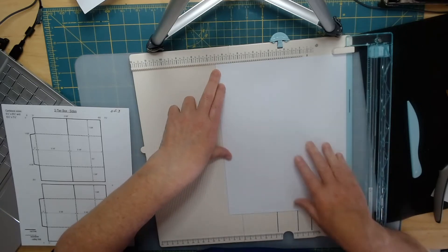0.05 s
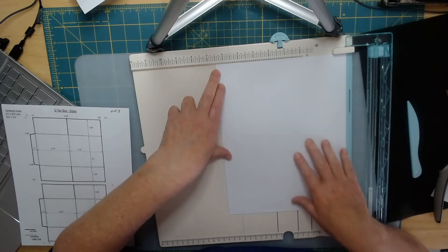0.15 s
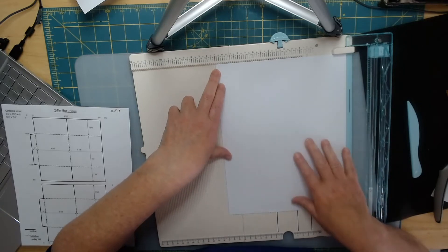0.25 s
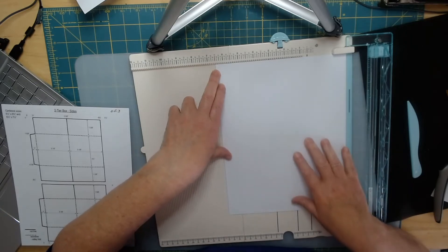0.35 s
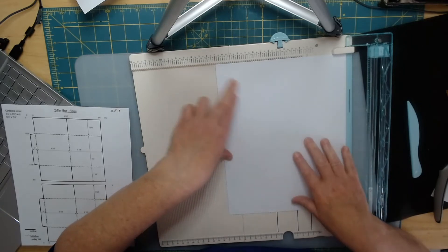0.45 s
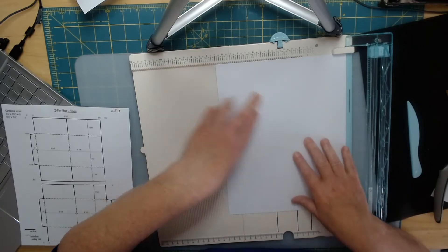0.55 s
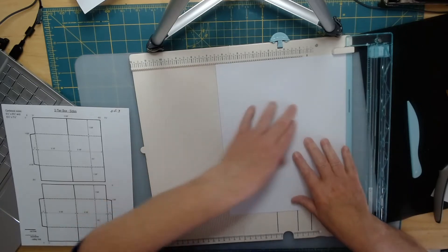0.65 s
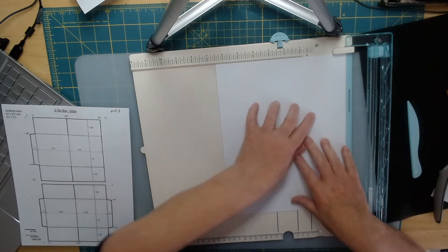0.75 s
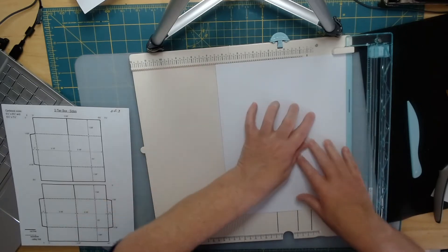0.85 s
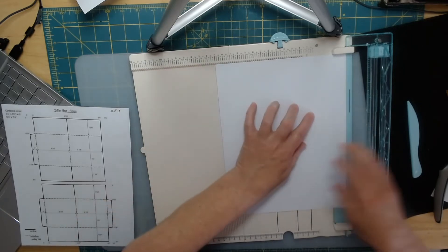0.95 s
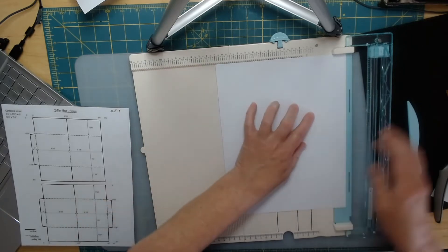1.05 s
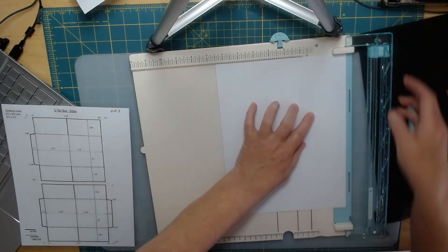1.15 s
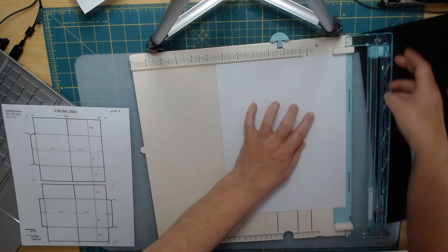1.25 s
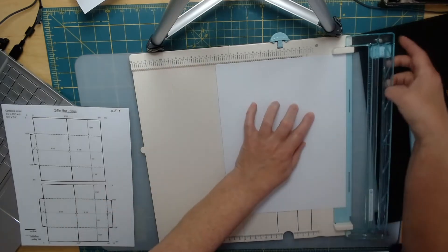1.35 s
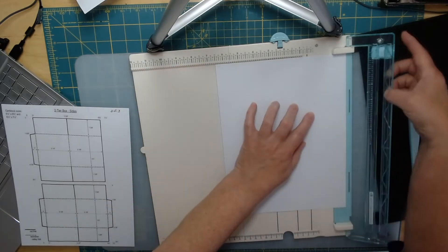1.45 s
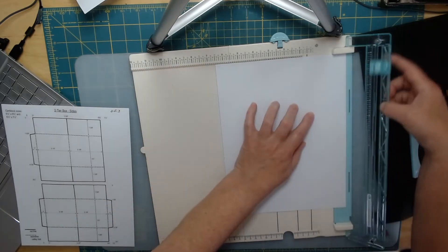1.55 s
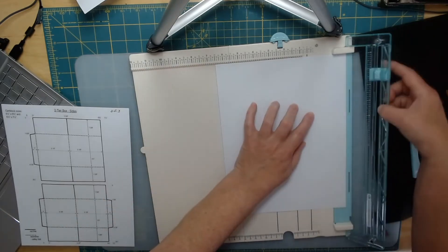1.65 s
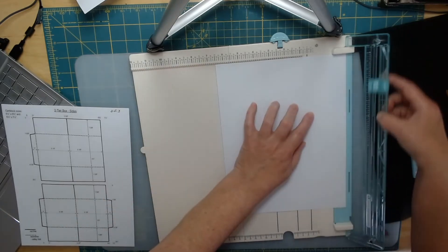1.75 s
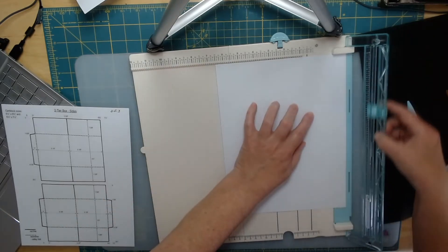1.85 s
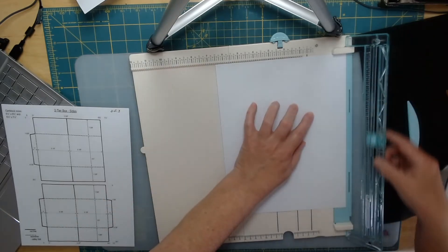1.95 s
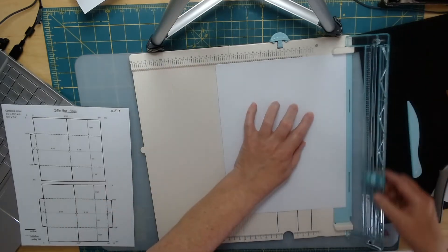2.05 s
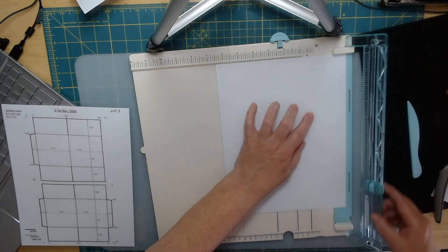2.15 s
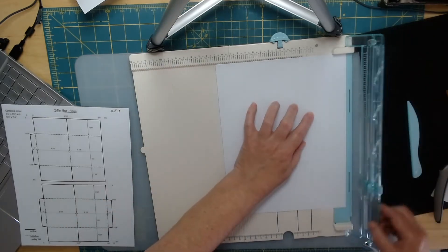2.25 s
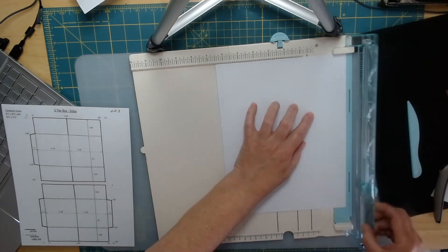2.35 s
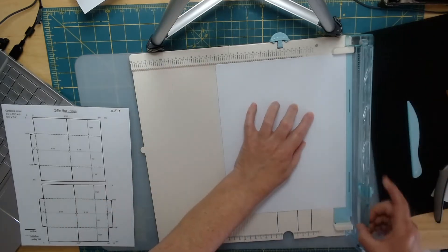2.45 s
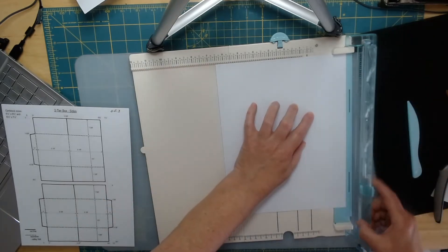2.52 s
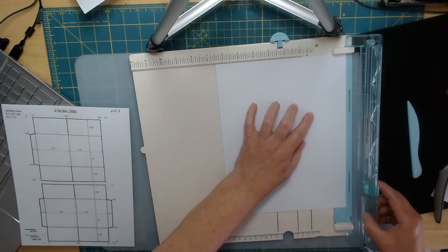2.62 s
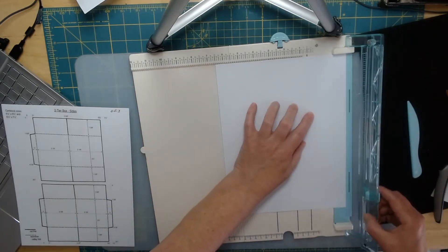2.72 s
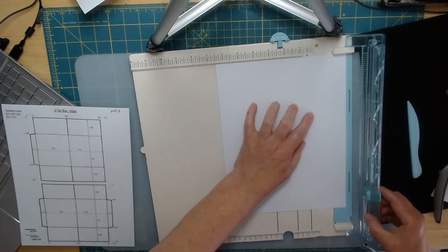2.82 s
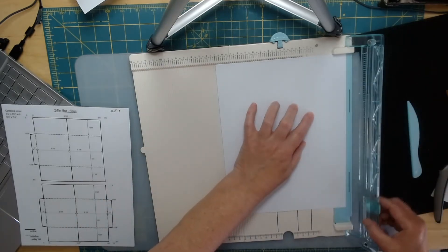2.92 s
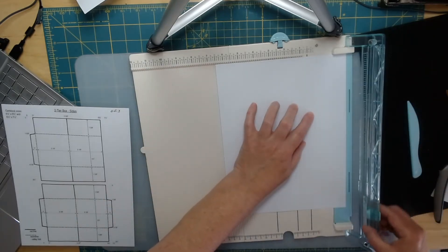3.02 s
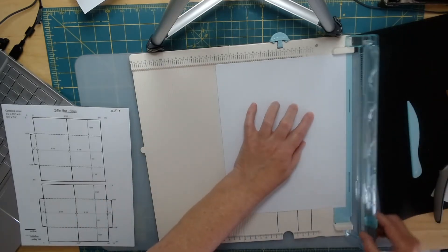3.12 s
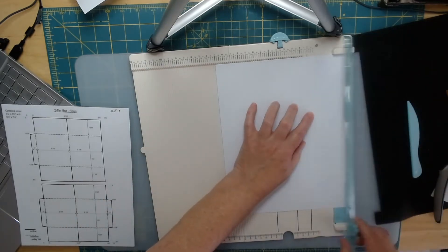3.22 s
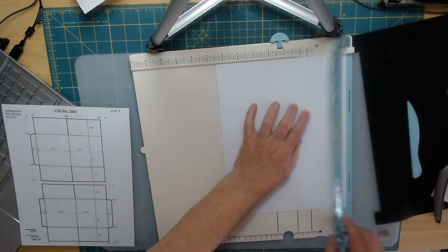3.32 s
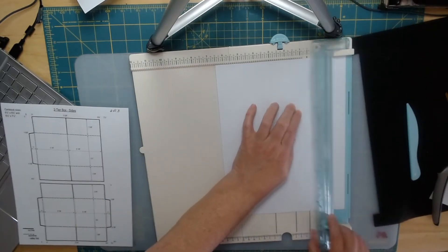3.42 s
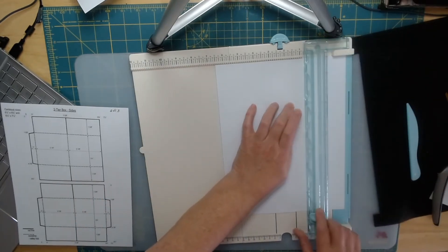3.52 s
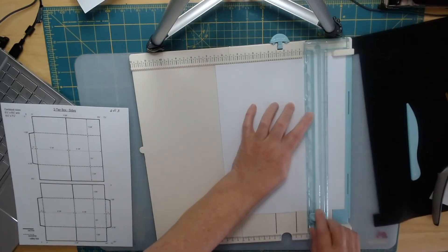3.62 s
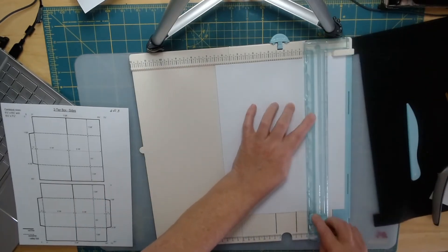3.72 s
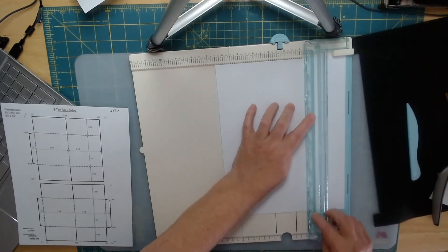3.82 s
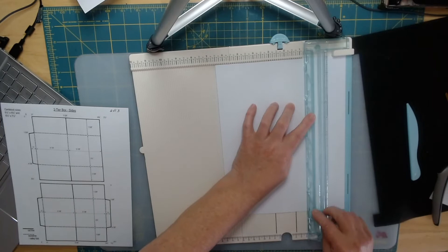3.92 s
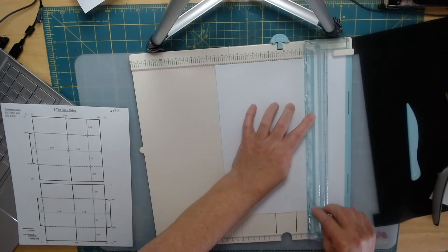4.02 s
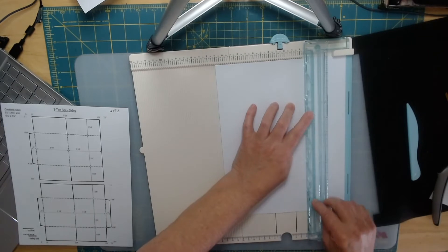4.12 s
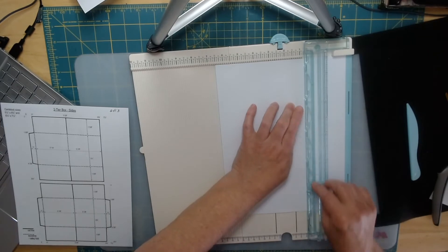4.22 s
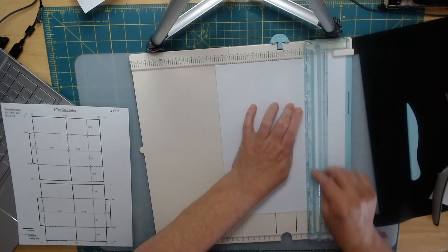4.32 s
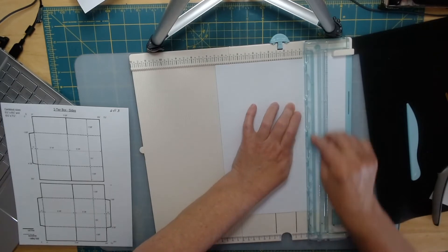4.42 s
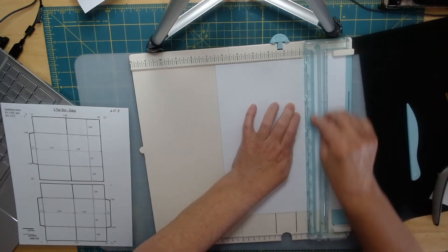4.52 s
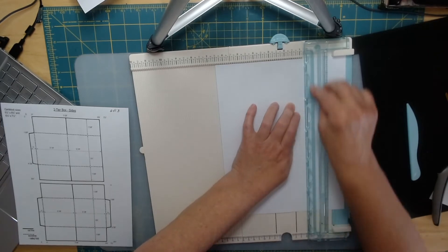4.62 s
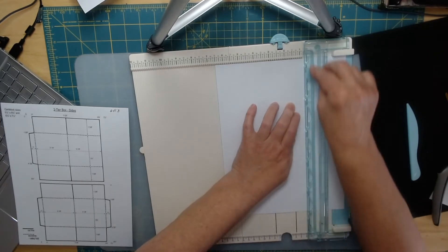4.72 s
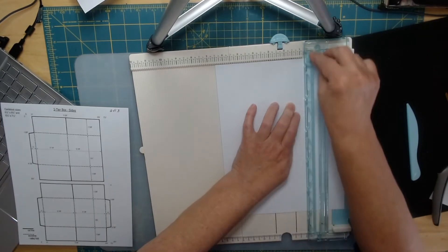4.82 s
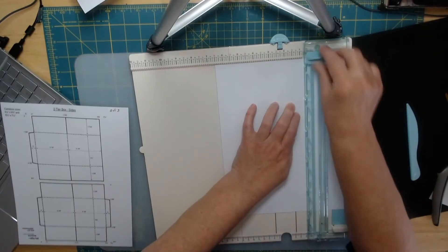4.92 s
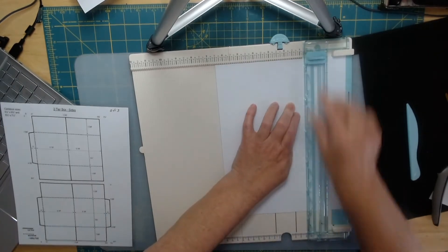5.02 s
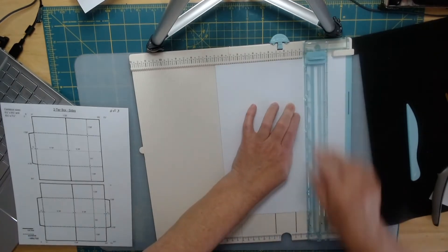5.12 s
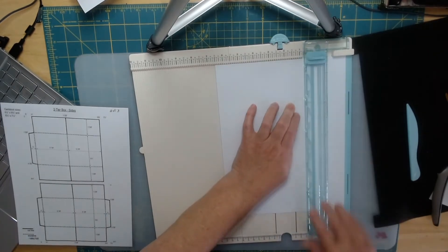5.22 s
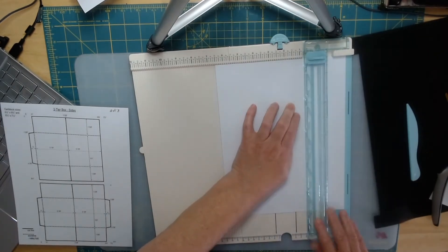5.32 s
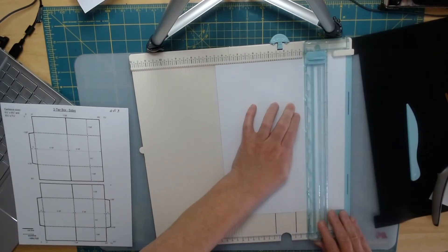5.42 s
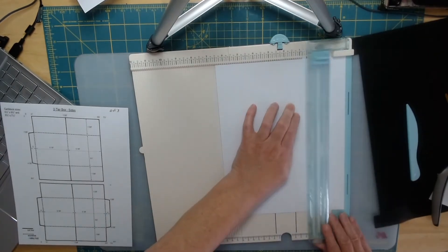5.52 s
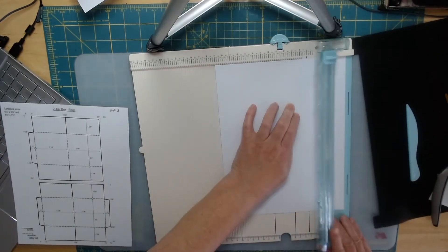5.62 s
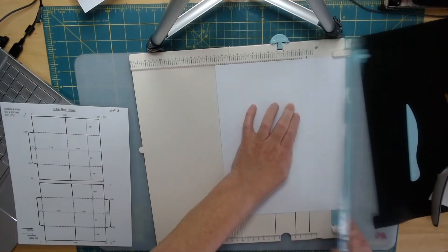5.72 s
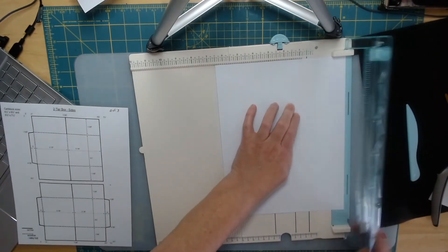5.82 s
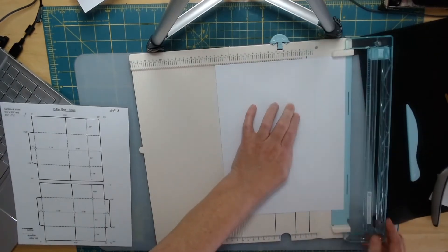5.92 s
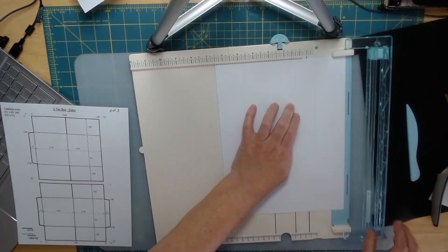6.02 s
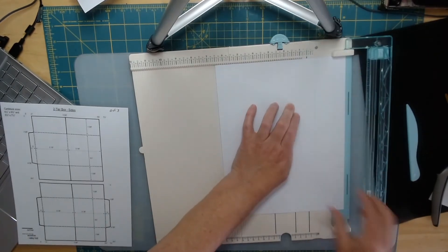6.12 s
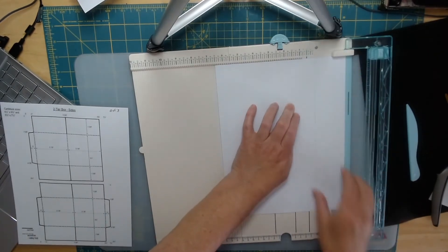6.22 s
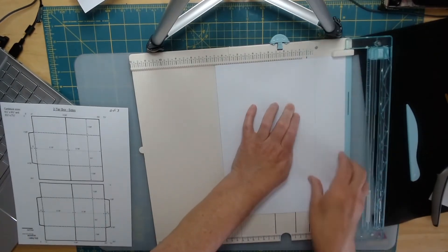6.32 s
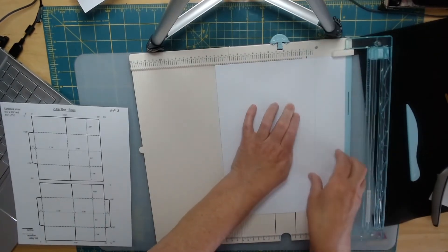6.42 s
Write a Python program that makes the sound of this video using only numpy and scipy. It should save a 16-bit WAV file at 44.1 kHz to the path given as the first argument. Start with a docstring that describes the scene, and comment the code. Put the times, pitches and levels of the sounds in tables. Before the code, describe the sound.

Close above a desk in a small quiet room, card slides briefly and fingers tick on plastic. A carriage scrapes along its rail with small clicks, a hinge groans, and the rail slaps shut loudly. After a pause with faint skin rubbing, a blade hisses through card for about a second, swelling brighter, and clacks against its stop. Light handling follows, then the rail flips open and rattles to rest.

```python
"""A paper trimmer's blade hisses through cardstock on a desk in a small room: noise slips coloured as scrape,
rasp and hiss follow its speed, with gliding echoes. First the card slides (grainy noise) and the carriage
scrapes along its rail; the hinge groans (slowing pulses) as the rail swings over and slaps shut.
After the cut the carriage clicks against its end stop, and the rail is flipped open and bounces to rest.
Blows are noise bursts plus damped modes; hands brush, click and push over a low room tone."""
import sys
import numpy as np
from scipy import signal
from scipy.fft import rfft, irfft, next_fast_len
from scipy.io import wavfile
from scipy.ndimage import uniform_filter1d, map_coordinates

SR = 44100
rng = np.random.default_rng(int(sys.argv[2]) if len(sys.argv) > 2 else 0)


def to_wav(sig):
    """Store sig (one row per channel, or 1-D mono) as 16-bit WAV at the path in sys.argv[1].

    Samples outside -1..1 are clipped; the rate is SR.
    """
    pcm = np.clip(np.atleast_2d(sig), -1, 1) * 32767
    pcm = np.round(pcm).astype(np.int16)
    wavfile.write(sys.argv[1], SR, pcm.T)  # frames by channels


N = 284974  # length in samples

# ringing of the rail lying on the board: pitch_hz, relative level_db, t60_s
SHUT_MODES = [(442, -19, 0.079), (627.6, 6.5, 0.11), (737, -4.5, 0.19), (822, -2, 0.11), (913.4, -2, 0.14),
              (975, 3, 0.12), (1111.6, 5.5, 0.13), (1278, -3.5, 0.045), (1434, -8, 0.08), (1760, -12, 0.12),
              (2220, -8.5, 0.15), (2520, -5, 0.22), (2770, -6, .11), (2830, -6.5, .1), (3340, -5, 0.077),
              (4130, -7, 0.21), (5110, -10.5, 0.13), (6200, -18.5, 0.093)]
# noise colour of skin rubbing on plastic and card: pitch_hz, relative level_db (per Hz)
SKIN_COLOUR = [(150, -7), (400, -3), (750, 4), (1100, -2.5), (1700, -10.5), (3000, -13.5), (8000, -36),
               (14000, -54)]


def amp(db):
    """Decibels to gain."""
    return 10 ** (np.asarray(db) / 20)


def unit(x):
    """x at rms 1."""
    return x / np.sqrt(np.mean(x ** 2) + 1e-20)


def along(points, hz):
    """(Hz, value) points read on a log frequency axis."""
    f, v = np.transpose(points)
    return np.interp(np.log(hz + 1), np.log(f), v)


def clock(size):
    """The time of each sample, in seconds."""
    return np.arange(size) / SR


def gains(rows):
    """One gain curve for each dB column, fading to silence outside the rows."""
    s, *columns = np.transpose(rows)
    times = np.r_[s[0] - .02, s, s[-1] + .02]
    return [amp(np.interp(clock(N), times, np.r_[-120, db, -120])) for db in columns]


def swell(s, half_length):
    """A rounded rise and fall about time s, with peak 1."""
    return np.exp(-np.abs((clock(N) - s) / half_length) ** 1.6)


def held(start, end, fade):
    """1 from start to end, fading in before and out after."""
    t = clock(N)
    return np.clip(1 + np.minimum(t - start, end - t) / fade, 0, 1)


def wobble(rate):
    """A smooth random curve, rate knots a second."""
    knots = rng.standard_normal(int(N * rate / SR) + 4)
    return map_coordinates(knots, [clock(N) * rate])


def filtered(x, response):
    """x times a response of frequency."""
    m = next_fast_len(len(x) + 8192)
    hz = np.fft.rfftfreq(m, 1 / SR)
    return irfft(rfft(x, m) * response(hz), m)[:len(x)]


def coloured(x, spectrum):
    """x with a (Hz, dB) colour, at rms 1."""
    return unit(filtered(x, lambda hz: amp(along(spectrum, hz))))


def causal(x, spectrum, size=4096):
    """A minimum-phase colour, so that nothing sounds ahead of a blow."""
    cepstrum = irfft(np.log(amp(along(spectrum, np.fft.rfftfreq(size, 1 / SR)))))
    cepstrum[1:size // 2] *= 2
    cepstrum[size // 2 + 1:] = 0
    impulse = irfft(np.exp(rfft(cepstrum)))
    return signal.fftconvolve(x, impulse)[:len(x)]


def add(track, s, x):
    """Mix x into the track at time s."""
    part = track[max(round(s * SR), 0):][:len(x)]
    part += x[:len(part)]


def in_room(x, wet_db):
    """x and a fresh diffuse noise tail whose lows ring longest."""
    # the room's decay: pitch_hz, t60_s
    room_decay = [(100, 0.55), (700, 0.27), (2500, 0.21), (7000, 0.25), (14000, 0.15)]
    hz, t, z = signal.stft(rng.standard_normal(SR // 2), SR, nperseg=256)
    decay = amp(-60 * t / along(room_decay, hz)[:, None])
    tail = signal.istft(z * decay, SR, nperseg=256)[1]
    tail = tail * (1 - np.exp(-clock(len(tail)) / 0.0028))
    wet = signal.fftconvolve(x, tail / np.linalg.norm(tail))[:len(x)]
    return x + amp(wet_db) * wet


def ring(modes, attack):
    """Damped modes at new strengths and phases, with peak 1."""
    t = clock(SR // 2)
    x = np.zeros(len(t))
    for hz, db, t60 in modes:
        decay = amp(db + rng.normal(0, 0.92) - 60 * t / t60)
        x += decay * np.sin(2 * np.pi * (hz * t + rng.random()))
    x = x * (1 - np.exp(-t / attack))
    return x / np.abs(x).max()


def knocks(rows, modes, attack, gain_db, wet_db):
    """Each (s, dB) blow rings one part."""
    out = np.zeros(N)
    for s, db in rows:
        add(out, s, amp(db + gain_db) * in_room(ring(modes, attack), wet_db))
    return out


def contact(levels_db, rattle, modes, ring_db, rise, crack_db, wet_db):
    """Plastic meets plastic: crack, brief chatter and the rail's ring, balanced by where and how hard it is struck."""
    # noise colours of the chatter and of the crack: pitch_hz, relative level_db (per Hz)
    chatter_colour = [(40, -5), (110, -4.5), (300, -2.5), (450, -6), (640, -2), (1100, -5.5), (1500, -1.5),
                      (2000, -4), (3200, -4), (4000, -11), (6500, -12.5), (8500, -24), (12000, -34),
                      (15500, -45.5)]
    crack_colour = [(600, -9.5), (2200, 3), (3300, -1), (5000, -6.5), (8500, -13.5), (12000, -26.5),
                    (15000, -36.5)]
    t = clock(SR // 2)
    grip = (1 - np.exp(-t / rise)) * amp(-60 * t / rattle)
    chatter = causal(rng.standard_normal(len(t)) * grip, chatter_colour)
    burst = np.exp(-((t - .0035) / .002) ** 2)
    crack = causal(rng.standard_normal(len(t)) * burst, crack_colour)
    dry = chatter / np.abs(chatter).max() + amp(crack_db) * crack / np.abs(crack).max()
    x = in_room(dry + amp(ring_db) * ring(modes, attack=0.003), wet_db)
    # thud, knock, click and tick: each register's first 9 ms sets the lift it needs
    registers = [(80, 350), (400, 1300), (1300, 5000), (5000, 15000)]  # Hz
    attack = slice(round(.009 * SR))
    balance = []
    for (lo, hi), db in zip(registers, levels_db):
        part = filtered(x, lambda hz: (hz > lo) & (hz < hi))
        lift = db - 10 * np.log10(np.mean(part[attack] ** 2))
        balance += [(lo * 1.2, lift), (hi / 1.2, lift)]
    return causal(x, balance)


def friction(spectrum, grain_db, flutter_db):
    """Fibres catching and letting go: dense tiny slips of uneven size, at rms 1."""
    unevenness = amp(grain_db * wobble(1500) + flutter_db * wobble(45))
    return coloured(rng.standard_normal(N) * unevenness, spectrum)


def patches(x, depth_db):
    """The card's resonances shift as it parts: narrow bands swell and fade."""
    z = signal.stft(x, nperseg=1024)[2]
    field = uniform_filter1d(rng.standard_normal(z.shape), size=4, axis=0)  # across pitch
    field = uniform_filter1d(field, size=7, axis=1)  # across time
    return signal.istft(z * amp(depth_db * unit(field)), nperseg=1024)[1][:N]


def room_tone():
    """Low ventilation noise and hiss as coloured noise, and a little electrical hum as steady sines."""
    # faint electrical tones: pitch_hz, level_db (rms)
    hum_tones = [(60, -63), (120, -69), (5001, -95), (8000, -94), (8995, -98)]
    # noise colour of the room: pitch_hz, relative level_db (per Hz)
    tone_colour = [(20, -7), (35, -14.5), (50, -9), (64, 1), (95, -15), (200, -21), (400, -26), (1300, -34),
                   (2300, -40), (4500, -43.5), (6500, -47.5), (8000, -44), (10000, -52.5), (15500, -59)]
    hum = np.zeros(N)
    for hz, db in hum_tones:
        hum += amp(db) * np.sqrt(2) * np.sin(2 * np.pi * (hz * clock(N) + rng.random()))
    return amp(-55.5) * coloured(rng.standard_normal(N), tone_colour) + hum


def desk_jolts():
    """The desk is jolted under the trimmer and rings in a few low damped modes."""
    # jolts: start_s, relative level_db
    jolts = [(3.472, -24), (3.527, -41.5), (4.82, -24), (5.952, -33.5)]
    # ringing of the desk: pitch_hz, relative level_db, t60_s
    desk_modes = [(64, 0, .13), (84, -1, .11), (112, -3, .09)]
    return knocks(jolts, desk_modes, attack=0.0053, gain_db=1.0, wet_db=-11)


def board_pushes():
    """Soft pushes of the hands ring the board's low modes."""
    # pushes: start_s, relative level_db
    pushes = [(0.607, -35.5), (0.697, -37), (0.753, -40), (0.79, -33), (1.452, -35), (2.101, -33),
              (2.193, -28.5), (2.409, -37), (2.511, -34.5), (2.573, -34), (2.676, -30.5), (3.882, -31),
              (4.199, -31.5), (5.506, -31), (5.556, -33.5), (5.789, -31.5), (6.027, -22.5)]
    # ringing of the board: pitch_hz, relative level_db, t60_s
    board_modes = [(124, 1.5, 0.21), (134.5, 1.5, 0.14), (170.5, -3.5, 0.16), (234, -1, 0.025),
                   (294.8, -7.5, 0.18), (392, -20, 0.16), (470, -5.5, 0.11), (567, -11, 0.074)]
    return knocks(pushes, board_modes, attack=0.0031, gain_db=-4.0, wet_db=-13.0)


def brushes():
    """Skin rubs lightly and unevenly over plastic and card, swelling and rasping where a finger scuffs."""
    # hands resting and shifting on the trimmer: start_s, end_s, relative level_db
    rubs = [(1.085, 1.44, -62), (2.47, 2.666, -57), (3.635, 3.897, -50), (4.897, 5.248, -62.5),
            (5.36, 5.779, -55), (6.279, 6.44, -52)]
    # short scuffs of fingers: start_s, relative rasp_db, relative body_db
    scuffs = [(0.065, -48, -37), (1.233, -34.5, -44.5), (1.289, -32.5, -48), (1.571, -37, -39.5),
              (2.19, -45.5, -47.5), (2.473, -53, -66), (3.33, -43, -39.5), (3.665, -46.5, -44),
              (4.946, -45.5, -50), (5.527, -43, -39.5), (5.61, -41, -42), (5.749, -37.5, -41),
              (6.33, -49.5, -48.5)]
    # noise colour of the rasp: pitch_hz, relative level_db (per Hz)
    rasp_colour = [(800, -28), (1400, 5), (1900, 4.5), (2800, -7.5), (4000, -22.5), (7000, -25.5),
                   (14000, -44)]
    body = sum(amp(db - 6.5) * held(start, end, fade=.03) for start, end, db in rubs)
    body = body * amp(5.5 * np.tanh(wobble(26)))  # uneven pressure, within 5.5 dB either way
    rasp = amp(-17) * body
    for s, rasp_db, body_db in scuffs:
        scuff = swell(s + .004, half_length=0.015)
        body = body + amp(body_db - 5.5) * scuff
        rasp = rasp + amp(rasp_db - 9.5) * scuff
    rub = body * friction(SKIN_COLOUR, grain_db=4, flutter_db=1.5)
    rub += rasp * friction(rasp_colour, grain_db=4.5, flutter_db=1.5)
    return in_room(rub, wet_db=-9.5)


def clicks():
    """Small clicks of fingers, carriage and end stops; all chatter alike, and the board thuds with each knock."""
    # clicks: start_s, relative click_db, knock_db of the body, relative bright tick_db
    click_rows = [(0.4545, -41.5, -42, -82), (0.611, -54, -49, -66), (0.7857, -41.5, -40, -56.5),
                  (1.3022, -43.5, -45.5, -75), (1.4507, -34, -41, -51.5), (1.5274, -28, -45, -46),
                  (1.5926, -25.5, -38.5, -49), (2.0944, -29, -41.5, -54.5), (2.1425, -43.5, -45.5, -65),
                  (2.3539, -36, -41.5, -60), (2.508, -40.5, -56, -62), (2.558, -37, -40, -74),
                  (2.6708, -28, -39.5, -44.5), (2.8406, -27.5, -41.5, -45.5), (3.194, -43.5, -41, -85),
                  (3.2828, -37.5, -53, -59), (3.2943, -31, -36.5, -54.5), (3.3512, -26, -32.5, -53),
                  (3.3797, -37.5, -49, -63), (3.4252, -36, -54, -61), (3.7832, -62, -47, -73),
                  (3.8742, -44.5, -43, -68.5), (3.8855, -51.5, -37, -68.5), (4.1923, -50, -32.5, -62),
                  (4.8217, -13.5, -32.5, -40.5), (5.3021, -46, -61, -64.5), (5.4862, -26, -42.5, -51.5),
                  (5.7805, -35, -33.5, -51), (5.7889, -20.5, -39.5, -41)]
    rattle_s, thud_db = 0.051, -6  # chatter t60; low thud relative to the knock
    out = np.zeros(N)
    for s, click_db, knock_db, tick_db in click_rows:
        levels = [knock_db + thud_db, knock_db, click_db - 10.5, tick_db - 1.0]
        click = contact(levels, rattle_s, SHUT_MODES, ring_db=-19.5, rise=0.0024, crack_db=-1.5, wet_db=-7.5)
        add(out, s, click)
    return out


def paper():
    """The card slides: the board radiates the scrape, the sheet a bright hiss, and its edge flicks down."""
    # the slide: time_s, relative scrape_db, relative hiss_db
    slide = [(0.28, -72, -107), (0.39, -44.5, -63), (0.536, -71, -65), (0.63, -68, -62.5),
             (0.776, -58, -82), (0.92, -57, -75)]
    # noise colours of scrape and hiss: pitch_hz, relative level_db (per Hz)
    scrape_colour = [(200, -21), (400, 1), (650, 2.5), (900, 0), (1300, -7), (2200, -10.5), (3500, -20),
                     (6000, -33)]
    hiss_colour = [(2500, -30), (4200, -2), (6000, 4), (7400, 5), (9500, -2.5), (11500, -10),
                   (15000, -28.5)]
    # the card's edge against the board: start_s, level_db
    flicks = [(0.608, -52), (0.742, -59), (0.786, -56)]
    scrape, hiss = gains(slide)
    out = amp(-3.5) * scrape * friction(scrape_colour, grain_db=2.5, flutter_db=3.0)
    out += amp(0.5) * hiss * friction(hiss_colour, grain_db=2.5, flutter_db=0.0)
    t = clock(SR // 4)
    flick_t60_s = 0.047
    for s, db in flicks:
        add(out, s, amp(db - 60 * t / flick_t60_s) * coloured(rng.standard_normal(len(t)), hiss_colour))
    return out


def carriage():
    """The empty carriage scrapes unevenly along the rail; its smooth hiss swells and fades with its speed."""
    # the scrape: time_s, relative level_db
    scrape_rows = [(1.7, -64), (1.794, -57.5), (1.802, -48), (1.898, -59), (1.942, -44.5), (1.974, -48),
                   (1.992, -37.5), (2.062, -56.5), (2.085, -52)]
    # noise colours of scrape and hiss: pitch_hz, relative level_db (per Hz)
    scrape_colour = [(200, -20), (400, -8), (650, -2), (950, 0.5), (1300, -3.5), (1800, -2.5), (2700, -5.5),
                     (3600, -14), (6000, -32.5)]
    hiss_colour = [(3000, -19), (4500, 0), (6200, 0), (7500, -3.5), (9500, 0), (11000, -7), (12500, -19),
                   (15000, -31)]
    fastest_s, swell_s, hiss_db = 1.984, 0.155, -60
    scrape, = gains(scrape_rows)
    body = amp(-0.5) * scrape * friction(scrape_colour, grain_db=2.0, flutter_db=-0.4)
    hiss = amp(hiss_db) * swell(fastest_s, swell_s)
    return body + hiss * friction(hiss_colour, grain_db=-1.0, flutter_db=4.0)


def hinge(body_hz=288, width_hz=24, body_db=13):
    """The hinge groans as the rail swings over: stick-slip pulses, slowing overall, drive a board resonance."""
    # the groan: time_s, slips_per_s, relative level_db
    groan_rows = [(3.285, 217, -49.5), (3.299, 220, -43.5), (3.335, 151, -35), (3.36, 120, -40.5),
                  (3.395, 140, -45.5), (3.425, 113, -47)]
    s, rate, db = np.transpose(groan_rows)
    slip_rate = np.interp(clock(N), s, rate) * (1 + 0.033 * wobble(120))
    turns = np.cumsum(slip_rate) / SR
    slips = np.diff(np.floor(turns), prepend=0)  # one pulse a slip
    colour = [(60, -36.5), (115, 3.5), (190, -2.0), (250, -10.5), (400, -7.0), (700, -26.5),
              (1500, -23.0), (5000, -61.5)]  # Hz, dB
    groan = coloured(slips, colour) * gains(np.c_[s, db])[0]

    def resonance(f):
        """The direct groan plus one resonant band of the board."""
        damping = 1j * f * width_hz
        return 1 + amp(body_db) * damping / (body_hz ** 2 - f * f + damping)

    return amp(-0.5) * in_room(filtered(groan, resonance), wet_db=-13.5)


def slap(overload_db=-14, overload_t60=.01):
    """The long rail grazes the board, then slaps shut, chattering along its length as it lands."""
    # graze and slap: start_s, relative click_db, thud_db, knock_db and tick_db, rattle t60_s
    landings = [(3.4436, -27, -30, -31, -49, 0.09), (3.4712, 1.5, -27, -9.5, -16, 0.079)]
    out = np.zeros(N)
    for s, click_db, thud_db, knock_db, tick_db, rattle in landings:
        levels = [thud_db - 1.5, knock_db - .5, click_db - 10.5, tick_db - .5]
        blow = contact(levels, rattle, SHUT_MODES, ring_db=-10.5, rise=0.00066, crack_db=0.5, wet_db=-10.0)
        add(out, s, blow)
    # a very short bright noise burst, as of an overloaded microphone, tops the loudest blow
    t = clock(SR // 10)
    burst = rng.standard_normal(len(t)) * amp(-60 * t / overload_t60)
    overload = causal(burst, [(3000, -15.0), (13000, -8.5), (14500, -3.0)])
    add(out, landings[-1][0] + 0.0043, amp(landings[-1][1] + overload_db) * overload)
    return out


def bounces():
    """The opened rail hits its hinge stop, shakes the board and rebounds ever more weakly, ringing freely."""
    # bounces: start_s
    hits = [5.9563, 6.0258, 6.0817, 6.136, 6.1835, 6.2419]
    # thud, knock, click and tick of a bounce: level_db at the first, share of the loss (a ratio)
    bounce_registers = [(-43, 0.093), (-32.5, 0.35), (-23.5, 0.74), (-30.5, 0.99)]
    # ringing of the rail hanging free: pitch_hz, relative level_db, t60_s
    open_modes = [(459, -8, 0.16), (662, -6, 0.14), (743.4, 0.5, 0.11), (1034, 3, 0.071),
                  (1610, -1.5, 0.065), (1716, 0.5, 0.072), (2800, -9.5, 0.027), (2940, -1, 0.047),
                  (3760, -10, 0.05), (4660, 5.5, 0.029), (5940, -14, 0.096), (6360, -20, .1)]
    loss_db = 1.21  # times the square of the number of rebounds
    landing_rattle_s, bounce_rattle_s = .165, 0.077  # t60: the first landing shakes the whole rail
    # the board shudders just after the landing
    shudder = amp(-28.5) * swell(hits[0] + 0.051, half_length=.021)
    shudder = shudder * friction(SKIN_COLOUR, grain_db=5.5, flutter_db=-2.0)
    out = in_room(shudder, wet_db=-8.5)
    for k, s in enumerate(hits):
        # the higher registers lose more, so weak bounces are duller
        levels = [db - share * loss_db * k ** 2 for db, share in bounce_registers]
        rattle = bounce_rattle_s if k else landing_rattle_s
        blow = contact(levels, rattle, open_modes, ring_db=-5.0, rise=0.00041, crack_db=-3.0, wet_db=-8.5)
        add(out, s, blow)
    return out


def carriage_recoil():
    """The carriage pings once in its own damped modes as it recoils from the end stop."""
    # the recoil: start_s, relative level_db
    recoil = [(4.8541, -19)]
    # ringing of the carriage: pitch_hz, relative level_db, t60_s
    carriage_modes = [(1215, 0, .07), (1290, -3, .06), (1400, -8, .05), (2020, -10, .06), (2920, -11, .05),
                      (4300, -19, .03)]
    return knocks(recoil, carriage_modes, attack=0.0011, gain_db=-2.5, wet_db=-38)


def cut(echo=0.39, count=5):
    """The blade slices the card, brighter with speed; near echoes glide up as it approaches, down as it leaves."""
    # scrape, rasp and hiss: relative slow_db at slow speed, gained_db at full speed
    cut_layers = [(-43.5, 5), (-42, 0.5), (-57, 9)]
    # noise colours of scrape, rasp, hiss and the board's rumble: pitch_hz, relative level_db (per Hz)
    scrape_colour = [(50, -15), (90, -0.5), (195, -9), (240, -9.5), (295, -8), (390, -15.5), (520, -2.5),
                     (650, 2.5), (850, -1.5), (1240, -3.5), (1600, -5.5), (2100, -9), (4000, -52)]
    rasp_colour = [(1200, -21.5), (1800, -3), (2250, -10.5), (2500, -1.5), (2800, -3), (3270, -1.5),
                   (3650, -7.5), (5200, -9), (6500, -26), (9000, -42.5)]
    hiss_colour = [(3500, -21), (5500, 3.5), (7000, 0.5), (8200, -4.5), (9100, -4), (10000, -11),
                   (11600, -17.5), (13000, -29), (15000, -32.5)]
    rumble_colour = [(40, -22.5), (90, 1.5), (280, -5.5), (600, -33), (2000, -80)]
    start_s, end_s, bite_s, bite_db = 3.917, 4.812, .16, 15  # it bites in, then runs to the end stop
    fastest_s, swell_s = 4.44, .2  # fastest a little past halfway
    pass_s, sweep_s_per_s2 = 4.45, .0042  # it passes under the microphone, where echoes are least delayed
    rumble_db, rumble_rise_db_per_s = -42.5, 39  # the board rumbles more as the blade nears the stop

    t = clock(N)
    depth = np.clip((t - start_s) / bite_s, 0, 1)
    speed = swell(fastest_s, swell_s)
    cutting = held(start_s, end_s, fade=0.0099)
    scrape, rasp, hiss = [cutting * amp(db + gained * speed) for db, gained in cut_layers]
    shallow_db = bite_db * (depth - 1)
    x = amp(-0.74 + 0.47 * shallow_db) * scrape * friction(scrape_colour, grain_db=3.0, flutter_db=0.86)
    x += amp(-2.5 + shallow_db) * rasp * friction(rasp_colour, grain_db=3.0, flutter_db=1.0)
    x += amp(-1.5 + .8 * shallow_db) * hiss * friction(hiss_colour, grain_db=2.0, flutter_db=1.8)

    # nearby surfaces echo the blade: shortest delay in s, share of the sweep
    detour = sweep_s_per_s2 * (t - pass_s) ** 2
    heard = x.copy()
    for delay, share in rng.uniform([.001, .4], [.006, 1.6], (count, 2)):
        heard += echo * map_coordinates(x, [(t - delay - share * detour) * SR], order=3)

    rumble = cutting * amp(rumble_db + rumble_rise_db_per_s * (t - end_s))
    heard += rumble * friction(rumble_colour, grain_db=3.5, flutter_db=-0.5)
    return patches(heard, depth_db=2.5)


def scene():
    """Everything on the desk, heard by one microphone above it."""
    sliding = brushes() + paper() + carriage() + hinge() + cut()
    blows = desk_jolts() + board_pushes() + clicks() + slap() + bounces() + carriage_recoil()
    return (room_tone() + sliding + blows)[None]


def record(dry):
    """The microphone rounds off the very loudest peaks and keeps nothing above its band limit."""
    top_hz = 16100
    rounded = dry[0] / (1 + np.abs(dry[0] / .9) ** 6) ** (1 / 6)
    return filtered(rounded, lambda hz: hz < top_hz)[None]


dry = scene()
out = record(dry)
to_wav(out)
```